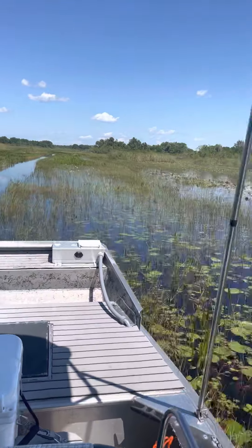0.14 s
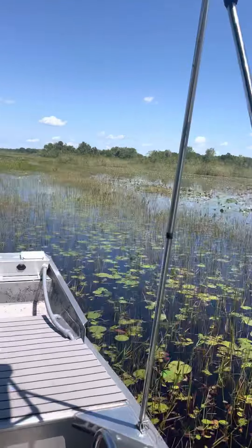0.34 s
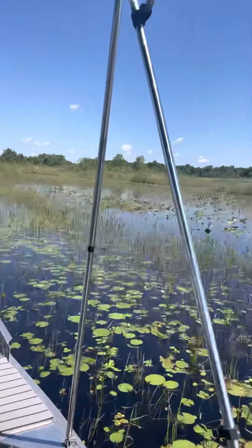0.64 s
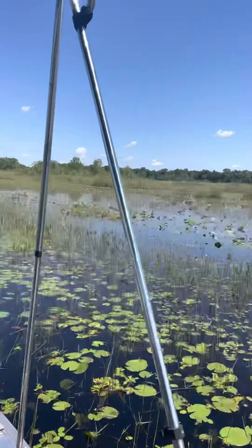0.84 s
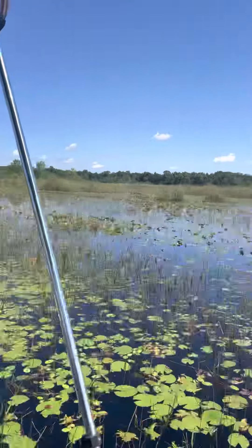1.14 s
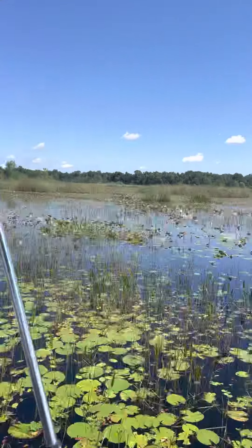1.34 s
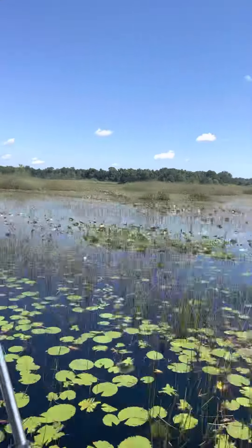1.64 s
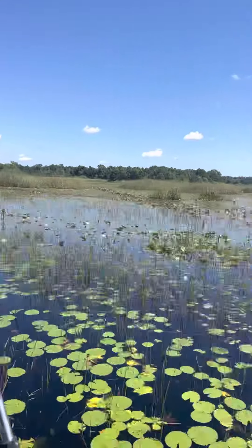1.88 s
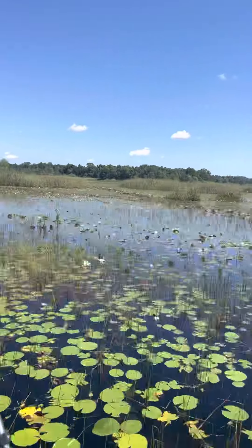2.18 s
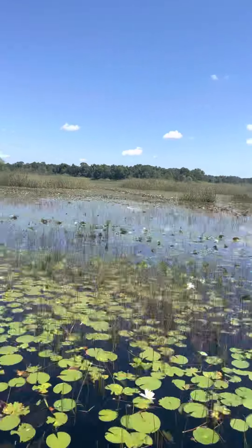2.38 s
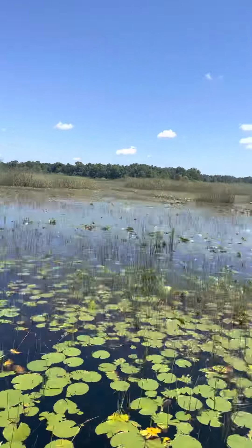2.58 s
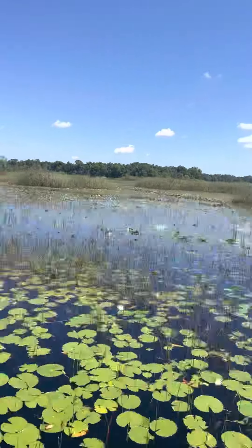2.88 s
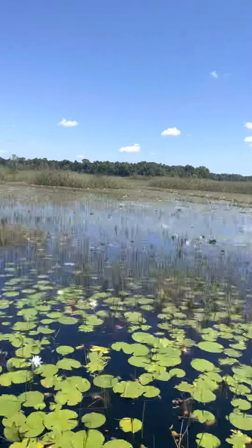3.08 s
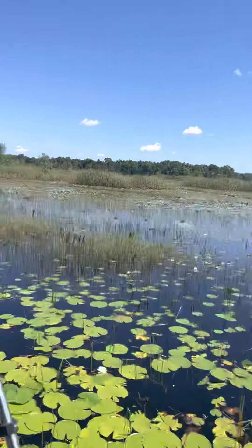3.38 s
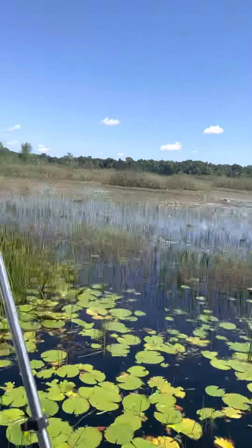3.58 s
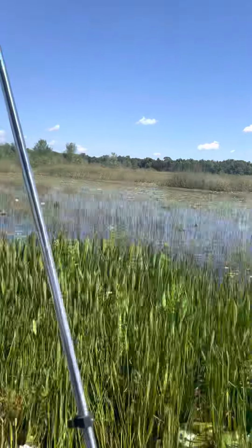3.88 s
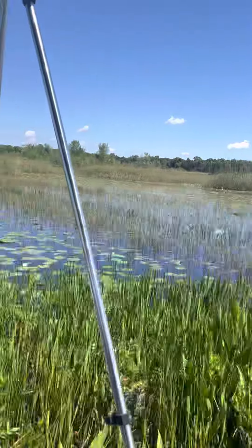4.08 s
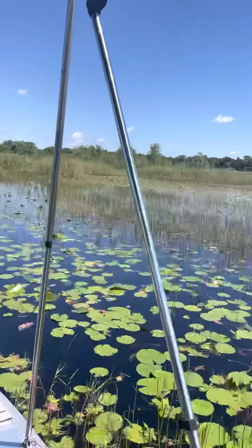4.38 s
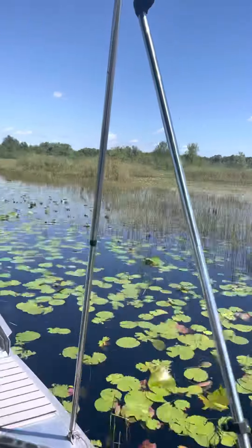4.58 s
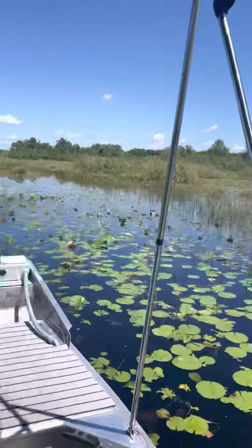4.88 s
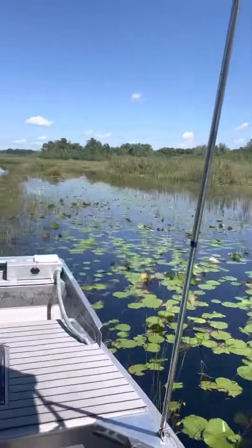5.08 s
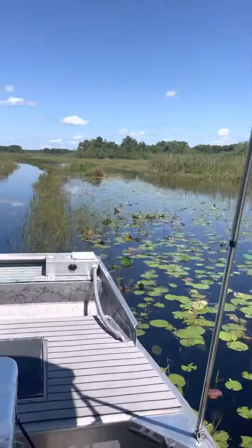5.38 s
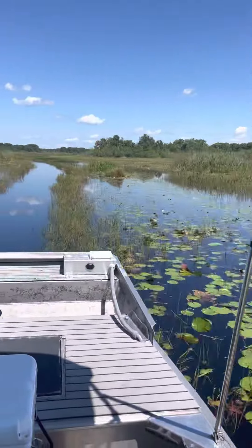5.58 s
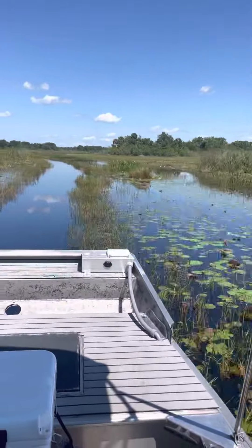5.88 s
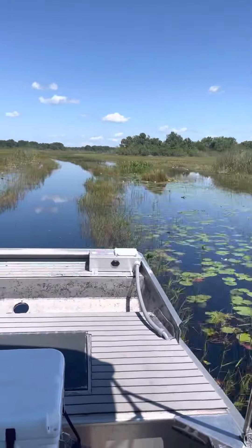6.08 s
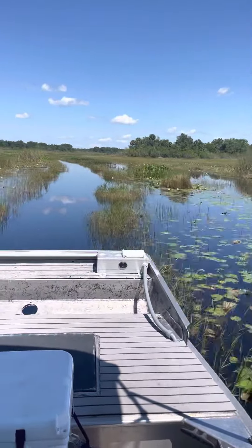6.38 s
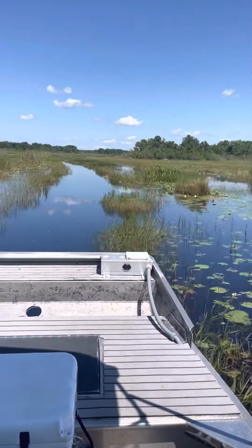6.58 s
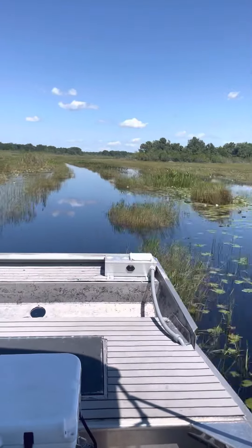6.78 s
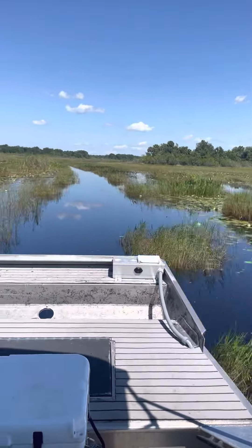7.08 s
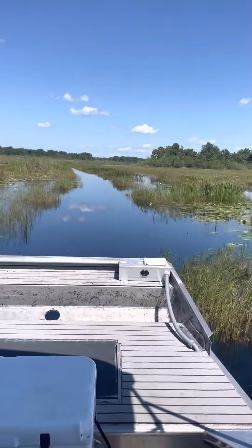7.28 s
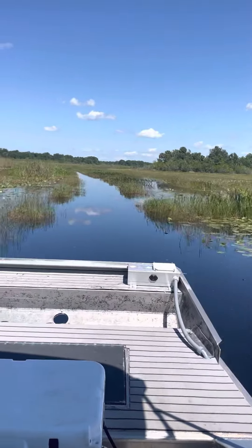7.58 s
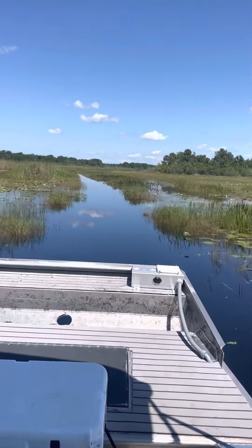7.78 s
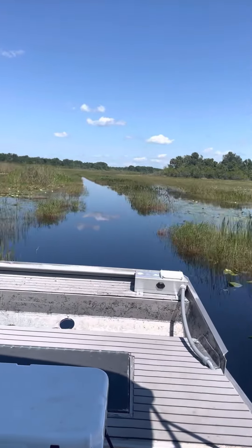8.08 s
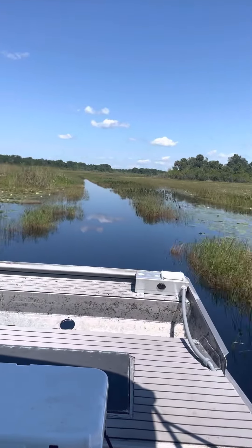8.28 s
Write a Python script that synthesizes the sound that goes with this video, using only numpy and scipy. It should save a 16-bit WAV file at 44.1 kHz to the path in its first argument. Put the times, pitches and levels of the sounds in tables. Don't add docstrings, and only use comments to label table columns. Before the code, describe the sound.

An airboat drones steadily across a marsh, a nearly pure low engine tone over propeller flutter, heavy wash and wind roar, with fine spray hissing.

```python
import sys
import numpy as np
from scipy import signal
from scipy.io import wavfile
from scipy.ndimage import uniform_filter1d

SR = 44100
rng = np.random.default_rng(int(sys.argv[2]) if len(sys.argv) > 2 else 0)


def unload_audio(sound):
    columns = np.transpose(np.atleast_2d(sound))
    steps = np.round(np.clip(columns, -1, 1) * 32767)
    wavfile.write(sys.argv[1], SR, steps.astype(np.int16))


def nominal_scale(level):
    x = np.asarray(level, float) / 20
    return 10 ** x


N = 372644
T = np.arange(N) / SR
STEP = 128
SLOW = T[::STEP]


def evened(x):
    return x / np.sqrt(np.mean(x ** 2) + 1e-20)


def column(rows, at, axis, log=False):
    x, y = np.transpose(rows)[[0, axis]]
    if log:
        return np.interp(np.log(at + 1), np.log(x + 1), y)
    return np.interp(at, x, y)


def fast(control):
    return np.interp(T, SLOW, control)


def swing(db):
    return fast(nominal_scale(db))


def ports(mid_side):
    mid, side = mid_side
    return np.array([mid + side, mid - side])


def drift(top_hz, count):
    hz = np.geomspace(top_hz / 20, top_hz, 16)[:, None]
    rows = []
    for phase in rng.random((count, 16)):
        sines = np.sin(2 * np.pi * (hz * SLOW + phase[:, None]))
        rows.append(evened((sines / np.sqrt(hz)).sum(0)))
    return rows


def rush(colour, patchy_db, wide, long, size=1024):
    hop, hz = size // 2, np.fft.rfftfreq(size, 1 / SR)
    a, b, c, d, patches = rng.standard_normal((N // hop + 3, len(hz), 5)).T
    patches = uniform_filter1d(patches, int(wide), axis=0)
    patches = evened(uniform_filter1d(patches, int(long), axis=1))
    share = 0
    if len(colour[0]) > 3:
        share = np.clip(column(colour, hz, axis=3, log=True), -.95, .95)[:, None]
    mid = a + 1j * b
    side = 1j * share * mid + np.sqrt(1 - share ** 2) * (c + 1j * d)
    density_db = [column(colour, hz, axis=k, log=True) for k in (1, 2)]
    level = nominal_scale(density_db)[:, :, None] * np.sqrt(SR / size / 2)
    z = np.array([mid, side]) * level * nominal_scale(patchy_db * patches)
    return signal.istft(z, SR, window="cosine", nperseg=size, noverlap=hop)[1][:, :N]


def heard(layer):
    # (time [s], turn from bow 0 to abeam 1 [-], openness to the stern [dB])
    holding = [(0, 0, 0.5), (.6, 0.42, 1.5), (.9, 0.92, 2), (1.5, 1, .5), (2.3, 0.92, -0.5),
               (3, 0.88, -0.5), (3.8, 0.78, -0.5), (4.5, 0.38, -1.5), (5.2, .2, -2.5), (6, 0.29, -3),
               (6.8, 0.077, -3.5), (7.6, 0.27, -3.5), (8.45, 0.1, -3.5)]
    rest_db, turn_db, share = layer
    turn, openness_db = column(holding, SLOW, axis=1), column(holding, SLOW, axis=2)
    return rest_db + turn_db * turn + share * openness_db


def gusting(axis):
    # (centre [s], length [s], mid level [dB], side level [dB])
    gusts = [(.6, 0.19, 2.5, -1.5), (.95, .35, 1, 2), (2.6, 0.54, 2.5, -1.5), (3.2, 0.78, -0.5, -3.5),
             (4.3, 0.43, 0.5, 1.5), (4.65, 0.38, 2, -1), (7.9, 0.81, 1.5, 1.2)]
    return sum(g[axis] * np.exp(-(2 * (SLOW - g[0]) / g[1]) ** 2) for g in gusts)


def roar(passes):
    # (frequency [Hz], mid density [dB per Hz], side density [dB per Hz])
    roar_colour = [(22, -91, -100.5), (35, -73.5, -79), (60, -47.5, -57), (122, -47.5, -52),
                   (180, -48, -50.5), (314, -51, -49), (440, -51.5, -44), (717, -56.5, -48.5),
                   (1058, -62, -56.5), (1440, -67.5, -64), (1960, -100, -88)]
    # (level at rest [dB], change for a full turn [dB], share of openness [-])
    mid_layer = (.5, 0.7, 0.98)
    side_layer = (-0.39, 2.5, 0.78)
    mid, side = rush(roar_colour, patchy_db=1.6, wide=14, long=3, size=2048)
    chop = 1 + 0.021 * np.cos(2 * np.pi * passes + 3.1)
    mid = mid * swing(heard(mid_layer) + gusting(axis=2)) * chop
    side = side * swing(heard(side_layer) + gusting(axis=3))
    return ports([mid, side])


def hiss_swells():
    # (start [s], length [s], level over calm [dB])
    swells = [
        (-.2, .65, 6.5),
        (3.1, .25, 3),
        (3.95, 1.22, 7.5),
        (6, .3, 3.5),
        (7.5, 1.2, 9),
    ]
    calm_db, calming_db_per_s, edge_s = -3, -.4, .18
    level_db = calm_db + calming_db_per_s * SLOW
    for start, long, db in swells:
        inside_s = np.minimum(SLOW - start, start + long - SLOW)
        level_db = level_db + db * np.clip(.5 + inside_s / edge_s, 0, 1)
    return level_db


def fine_hiss():
    # (frequency [Hz], mid density [dB per Hz], side density [dB per Hz])
    hiss_colour = [(6250, -105, -110), (8610, -89, -100), (10130, -110, -100), (13000, -110, -96),
                   (14500, -93.5, -100), (15500, -92.5, -100), (16500, -91, -100)]
    return ports(rush(hiss_colour, patchy_db=5.0, wide=15, long=2.5) * swing(hiss_swells()))


def drops():
    # (time [s], level [dB])
    ticks = [
        (6.467, -36),
        (7.048, -32),
    ]
    ping_hz, ping_s = 14500, .00025
    out = 0
    for s, db in ticks:
        out = out + nominal_scale(db) * np.exp(-((T - s) / ping_s) ** 2) * np.sin(2 * np.pi * ping_hz * (T - s))
    return out


def swish(passes):
    # (frequency [Hz], mid density [dB per Hz], side density [dB per Hz],
    # share of side that is mid turned a quarter cycle [-])
    swish_colour = [(500, -81.5, -75.5, 0), (1080, -70.5, -70.5, 0.16), (1560, -64, -72, 0.44),
                    (2275, -69.5, -73, .4), (3100, -65, -70.5, 0.96), (3820, -71, -77.5, .4),
                    (4900, -71.5, -75.5, .1), (6040, -76, -76, .5), (7500, -79.5, -77, 0.36),
                    (8740, -84.5, -77, 0.96), (9470, -94.5, -80, -0.32), (13200, -95, -86.5, -.2),
                    (15000, -92.5, -87.5, -.4), (16500, -85, -90, -.4)]
    # (level at rest [dB], change for a full turn [dB], share of openness [-])
    tips = (1.85, -2.07, 0.64)
    sweep = 1 + 0.08 * np.cos(2 * np.pi * passes + 1.5) + 0.03 * np.cos(4 * np.pi * passes + 1.2)
    return ports(rush(swish_colour, patchy_db=0.92, wide=12, long=2.5) * sweep * swing(heard(tips)))


def blades(passes):
    orders = [3, 6, 9, 12, 15, 18, 21, 24, 27, 30, 33, 36, 48, 53, 54, 56, 57, 60, 62, 63, 66, 68, 69, 70,
              72]
    # (left level [dB], right level [dB], left lead [rad])
    lines = [(-.3, .7, -.1), (2, 4, -.2), (-33.5, -30.5, 0), (-39, -36, .2), (-43, -34, .1),
             (-43, -35.5, 0), (-35.5, -25.5, 0), (-42, -35.5, .6), (-45, -40, 3.5), (-46, -38.5, 1.3),
             (-47, -43, 1.2), (-51, -48, 2.3), (-48, -47, 2.6), (-53, -48, 1.3), (-53, -52, 1.1),
             (-57, -54, 2.1), (-56, -52.5, .3), (-56, -51.5, .8), (-56, -49, .9), (-55, -52.5, .6),
             (-55, -47.5, .1), (-58, -54.5, .5), (-53, -50.5, .5), (-58, -56, .4), (-58, -53, .9)]
    # (level at rest [dB], change for a full turn [dB], share of openness [-])
    blade_pass = (-25, -2, 2)
    second = (-26, -5.8, 0.74)
    third = (5.26, -10.5, 0.61)
    seventh = (-12.5, 14.1, -0.35)
    overtones = (-1.4, 3.1, .6)
    groups = {3: blade_pass, 6: second, 9: third, 21: seventh}

    out = np.zeros((2, N))
    flutter, (jitter,) = drift(7.0, count=7), drift(4.0, count=1)
    late = 0.3284 + fast(.015 * jitter)
    for k, (order, (left_db, right_db, lead)) in enumerate(zip(orders, lines)):
        group_db = heard(groups.get(order, overtones)) * (.3 if order > 34 else 1)
        flutter_db = .8 if order in (3, 6, 21) else 2.8
        gain = np.sqrt(2) * swing(group_db + flutter_db * flutter[k % 7])
        turns = passes
        start = 0
        if order == 3:
            start = np.pi / 2
        elif order > 7:
            turns = passes + late - .183
            start = 1
        angle = 2 * np.pi * order / 3 * turns + start
        angle = angle + 0.00388 * order ** 2
        out[0] += nominal_scale(left_db) * gain * np.cos(angle + lead)
        out[1] += nominal_scale(right_db) * gain * np.cos(angle)
    return out


def engine(firings):
    # (level at rest [dB], change for a full turn [dB], share of openness [-])
    firing = (-18.5, -0.41, 1.08)
    firing_start, hull_hz, hull_db = .377, 230.1, -42
    tone_db = heard(firing) + .5 * drift(1.7, count=1)[0]
    tone = swing(tone_db) * np.cos(2 * np.pi * (firings + firing_start))
    hum_db = hull_db + 4.7 * drift(1.3, count=1)[0]
    hum = swing(hum_db) * np.cos(2 * np.pi * hull_hz * T)
    return np.sqrt(2) * (tone * nominal_scale([[-.7], [.7]]) + hum * [[-.7], [1]])


def scene():
    # (time [s], firing rate [Hz])
    throttle = [
        (0, 143.567),
        (5.5, 143.567),
        (5.7, 143.72),
        (8.45, 143.72),
    ]
    gear, blade_start = .50399, -.095
    firings = np.cumsum(column(throttle, T, axis=1)) / SR
    passes = gear * firings + blade_start
    return roar(passes) + fine_hiss() + drops() + swish(passes) + blades(passes) + engine(firings)


def thinned(x):
    margin_db, waver_db, step_db, eased = -6.9, 1.6, -7.4, .17
    low_hz, edge_hz = 7500, 15760
    frame = dict(window="cosine", nperseg=2048, noverlap=1024)
    x = np.pad(x, [(0, 0), (0, 2048)], "reflect")
    hz, t, z = signal.stft([x[0] + x[1], x[0] - x[1]], SR, **frame)
    mid, side = (abs(z[:, :1024]) ** 2).reshape(2, 32, 32, -1).mean(2)
    band = np.minimum(np.arange(1025) // 32, 31)

    waver = waver_db * rng.standard_normal(len(t))
    threshold = nominal_scale(2 * waver - 2 * eased * np.interp(t, SLOW, hiss_swells()))

    margin_db = margin_db + 2.2 * (np.arange(32) > 18)[:, None]
    ample = mid > nominal_scale(2 * margin_db) * threshold * uniform_filter1d(side, size=9, axis=1)
    kept = ample[band] | (hz < low_hz)[:, None]

    louder = uniform_filter1d(np.maximum(mid, side), size=5, axis=1)[band]
    raised = 1.4 * np.exp(-((hz - 12000) / 1800) ** 2)
    raised = raised + 3.5 * np.exp(-((hz - 12900) / 350) ** 2)
    floor = nominal_scale(2 * step_db) * threshold * louder * (1 + raised)[:, None]
    strong = (abs(z) ** 2 > floor) | (hz < 2080)[:, None]

    z = z * strong * np.array([kept, np.ones_like(kept)]) * (hz < edge_hz)[:, None] / 2
    return ports(signal.istft(z, SR, **frame)[1][:, :N])


def roll_off(x):
    return signal.sosfilt(signal.butter(12, 17100, fs=SR, output="sos"), x)


def record(dry):
    mix = thinned(1.6 * np.tanh(dry / 1.568))
    return roll_off(mix)


dry = scene()
out = record(dry)
unload_audio(out)
```